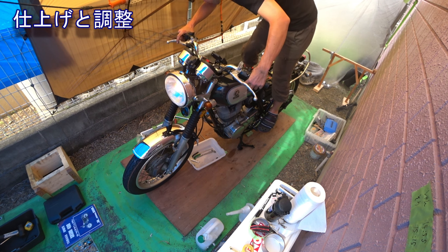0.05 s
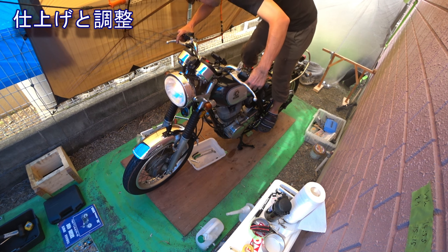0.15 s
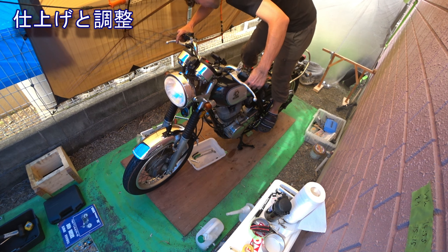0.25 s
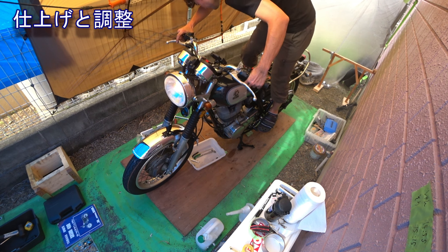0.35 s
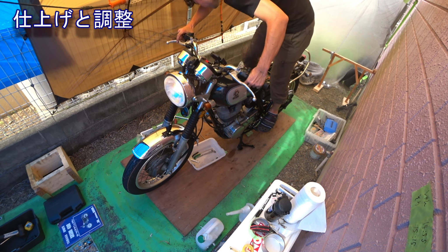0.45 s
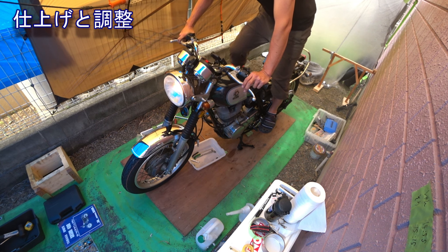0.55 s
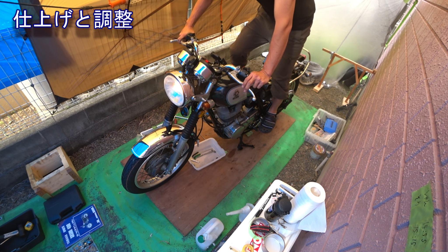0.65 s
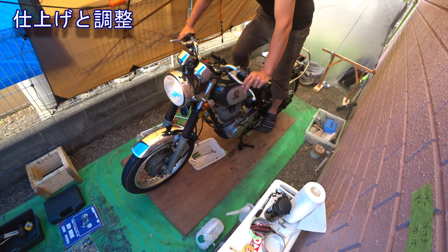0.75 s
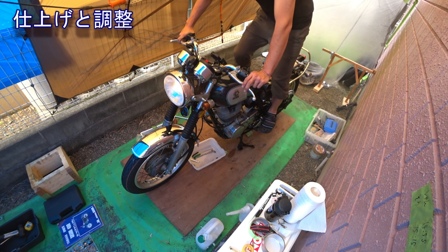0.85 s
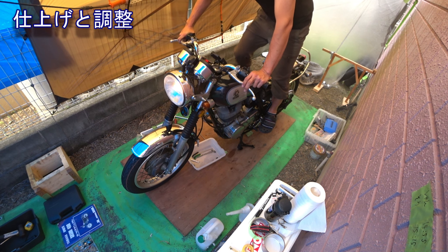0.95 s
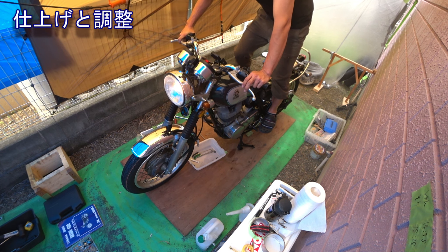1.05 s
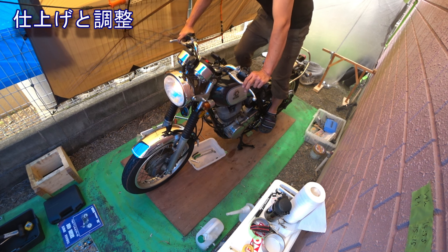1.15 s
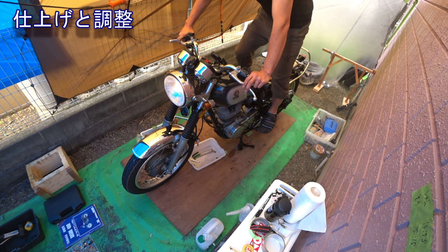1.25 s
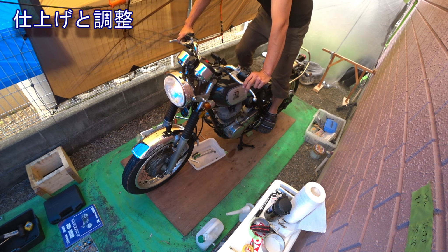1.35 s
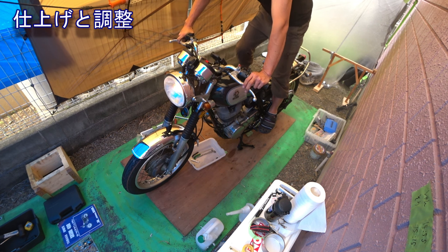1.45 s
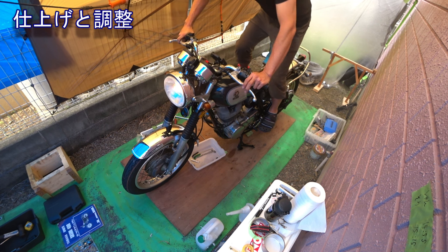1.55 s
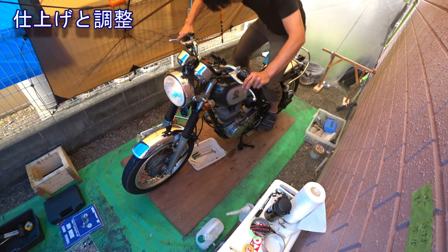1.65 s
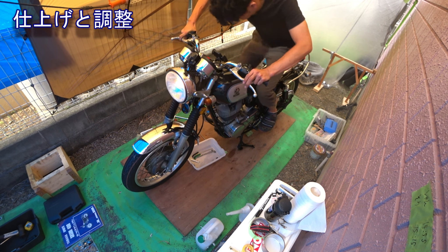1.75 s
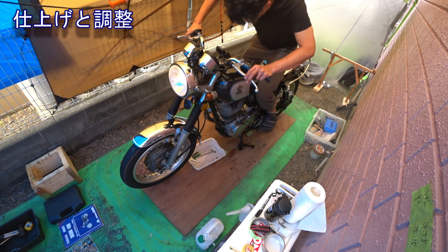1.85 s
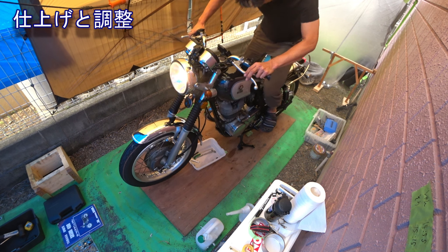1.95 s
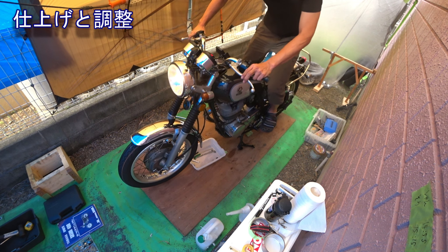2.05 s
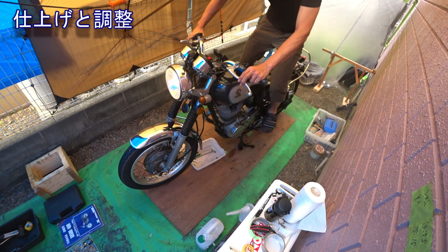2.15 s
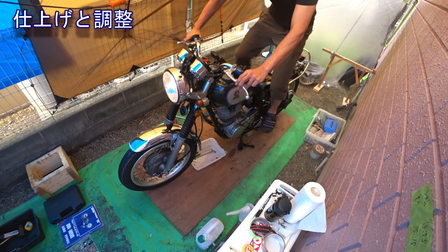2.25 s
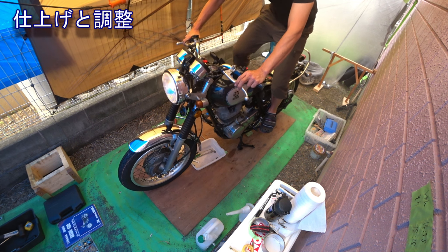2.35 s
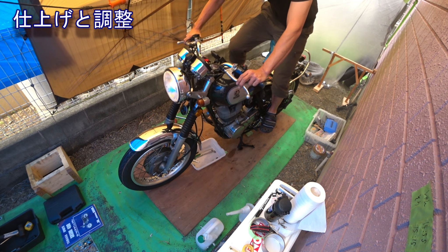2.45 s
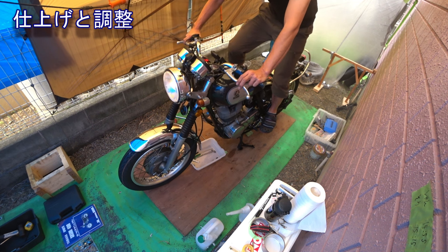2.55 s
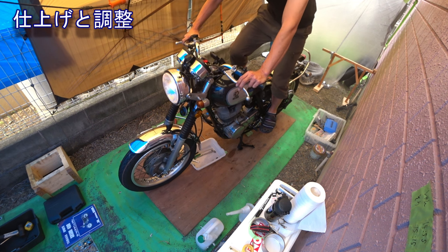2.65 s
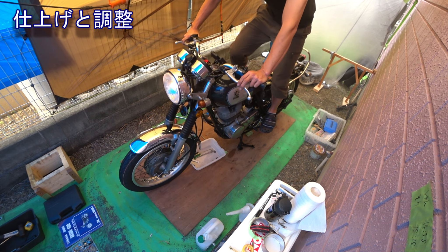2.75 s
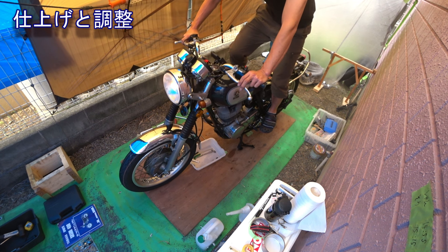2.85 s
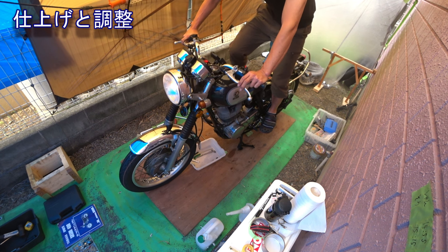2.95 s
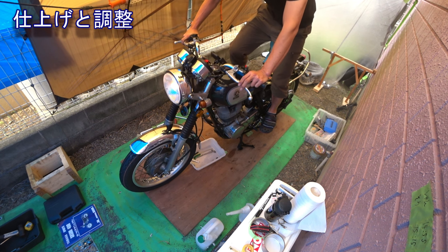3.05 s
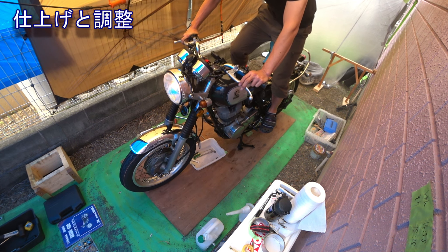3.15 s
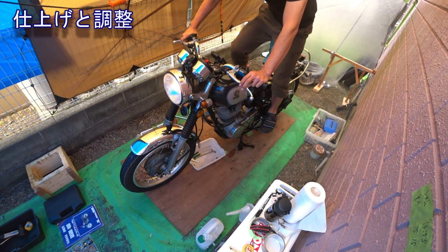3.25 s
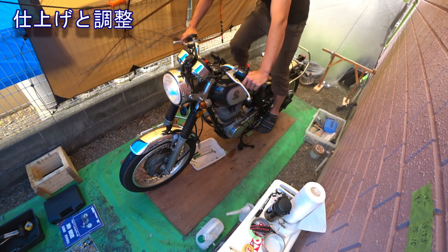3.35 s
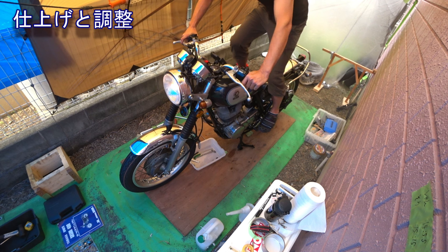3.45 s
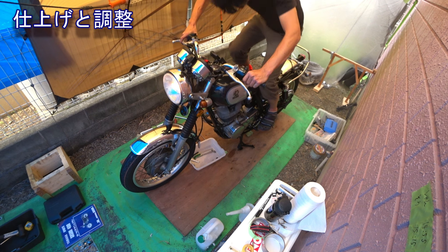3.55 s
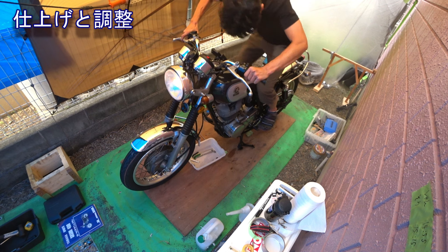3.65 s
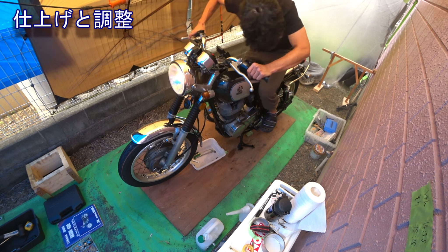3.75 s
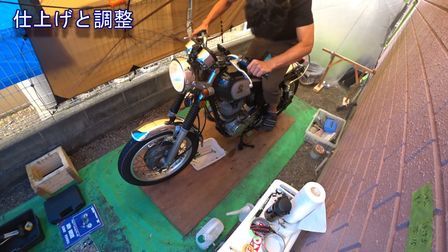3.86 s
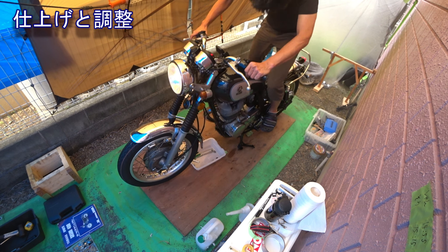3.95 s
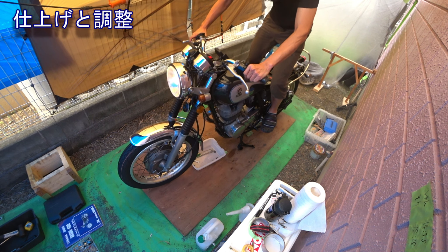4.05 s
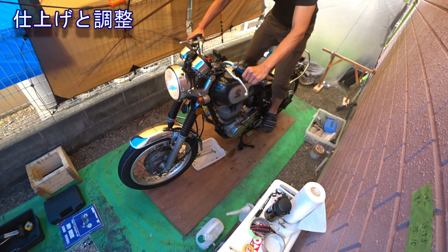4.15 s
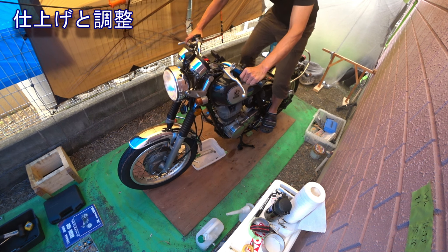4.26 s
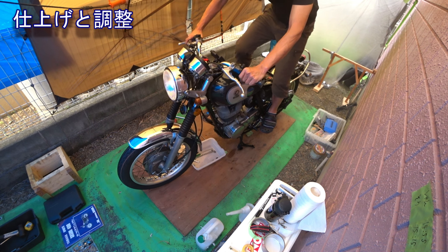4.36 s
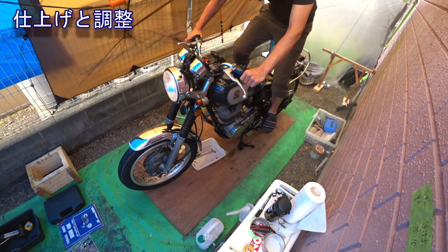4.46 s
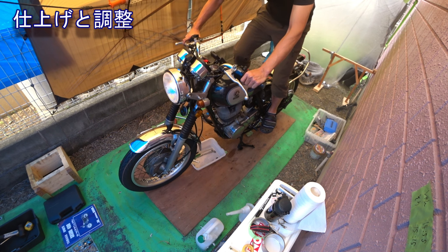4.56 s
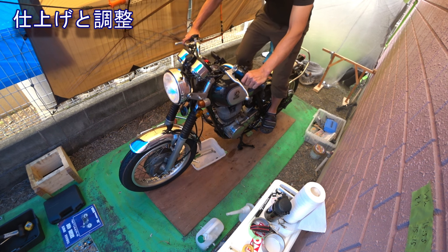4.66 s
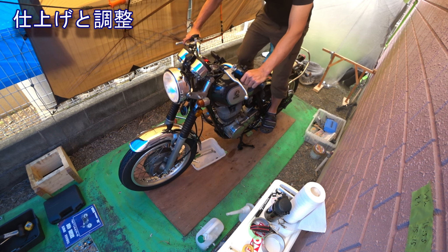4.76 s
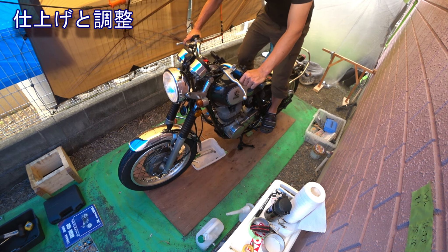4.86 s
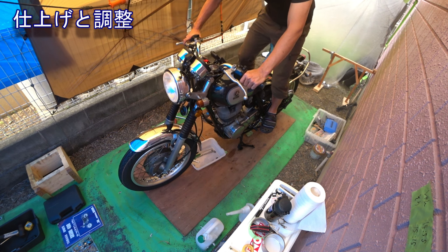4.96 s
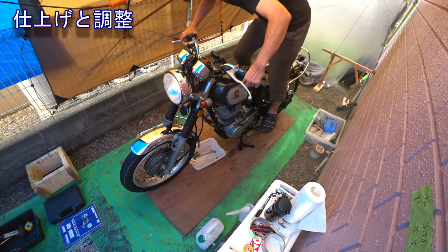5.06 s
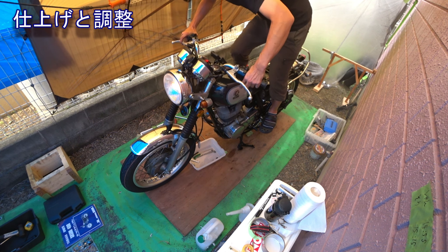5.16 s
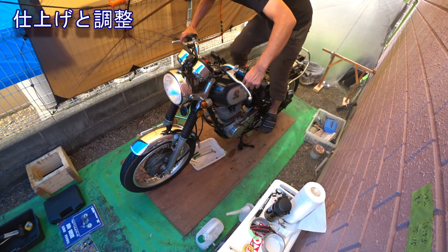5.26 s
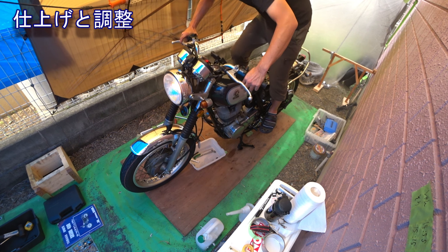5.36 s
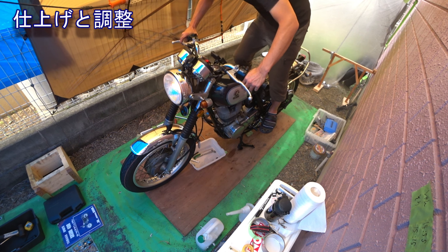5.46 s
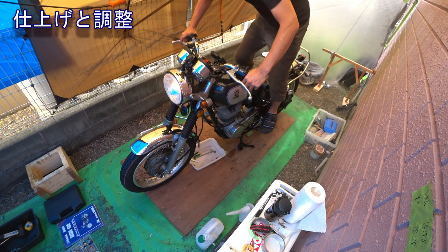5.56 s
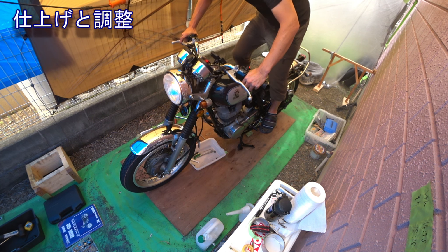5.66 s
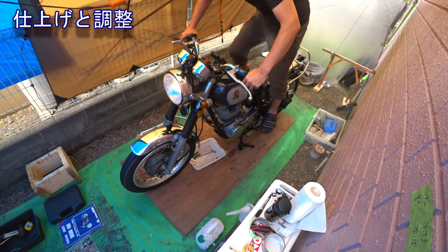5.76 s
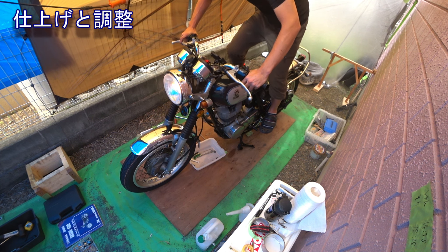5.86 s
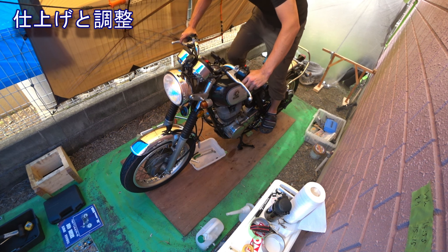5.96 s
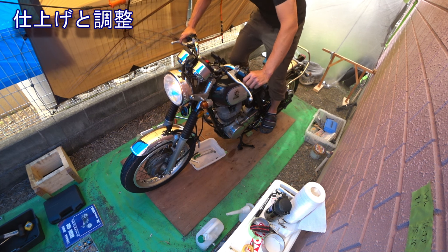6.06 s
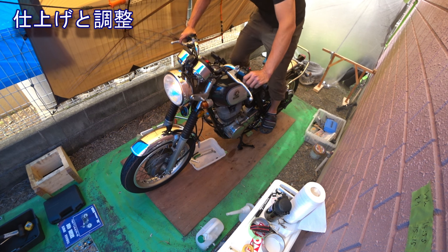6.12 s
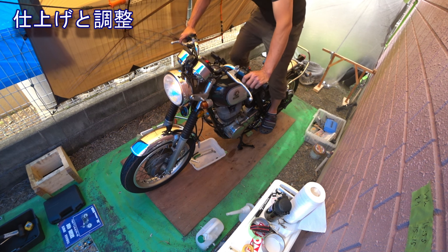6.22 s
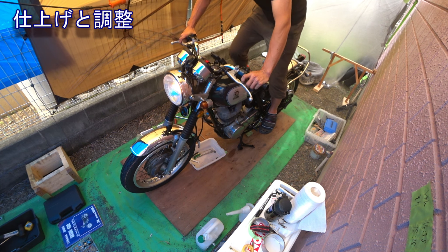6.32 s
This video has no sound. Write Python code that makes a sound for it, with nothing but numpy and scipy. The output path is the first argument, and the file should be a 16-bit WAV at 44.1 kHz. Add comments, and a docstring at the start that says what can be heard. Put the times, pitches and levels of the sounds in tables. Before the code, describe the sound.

Quiet, uneven outdoor air with tiny gritty ticks opens the scene, with small knocks in the first second, the clearest near 0.7 s, a momentary dropout at 0.55 s, and faint chirps around 1.0-1.5 s. At 1.65 s the kick lever clacks home; by 1.8 s teeth crunch, gears and valves clatter over a low rumble, and hollow exhaust puffs sag in pitch. From 1.96 to 2.23 s ringing ratchet clicks slow down, then the lever clunks at 2.3 s. Light taps, thin squeaks and scuffs fill 2.6-3.3 s; the level dips briefly at 3.36 s. A second kick begins at 3.6 s, similar, its clicks slowing until 4.13 s, with a clank at 4.2 s. No ignition follows. A knock at 4.65 s, a faint creak at 4.9 s, a sharp bright clack at 5.07 s, scattered metal taps to 6.2 s and a barely audible hum finish. Nearby small microphone, short close-wall reflections.

```python
"""A single-cylinder motorcycle is kicked over twice by foot in a narrow yard; it does not fire.
Small random impacts make the clatter of gears and valves over a rumble, and falling tones puff in the pipe.
Ringing snaps of the starter ratchet come slower as the crank coasts. Lever, stand and boot knock in
between: short noise bursts that ring the metal. Patchy noise is the air of the yard, with ticks of grit,
faint gliding squeaks, chirps and a hum. The level drops out briefly twice."""
import sys
import numpy as np
from scipy import signal
from scipy.fft import rfft, irfft
from scipy.io import wavfile
from scipy.ndimage import uniform_filter1d

SR = 44100
rng = np.random.default_rng(int(sys.argv[2]) if len(sys.argv) > 2 else 0)


def to_wav(sig):
    """Store sig (one row per channel, or 1-D mono) as 16-bit WAV at the path in sys.argv[1].

    Samples outside -1..1 are clipped; the rate is SR.
    """
    pcm = np.clip(np.atleast_2d(sig), -1, 1) * 32767
    pcm = np.round(pcm).astype(np.int16)
    wavfile.write(sys.argv[1], SR, pcm.T)  # frames by channels


N = 281799  # length in samples

# Swells of the yard air, before a small overall trim: time_s, middle_level_db, treble_level_db
YARD_SWELLS = [(0.0, -62.5, -65), (0.45, -59.5, -58), (0.8, -54.5, -58.5), (1.1, -61, -64.5),
               (1.6, -54.5, -53.5), (2.6, -48.5, -52.5), (2.85, -56.5, -58.5), (3.1, -57, -54.5),
               (3.25, -57.5, -56.5), (3.44, -43.5, -55), (3.58, -43, -42), (4.45, -46.5, -54),
               (5.0, -49.5, -51.5), (5.2, -55, -61), (5.5, -54.5, -61), (5.9, -58, -57.5),
               (6.06, -52, -59.5), (6.39, -55, -58)]
# Tone colour of the yard air: frequency_hz, level_db
YARD_COLOUR = [(18, -65), (30, -33), (135, -29), (157, -14), (245, -14), (392, -9.5), (466, -6.5),
               (514, -13), (567, -8.5), (1520, -4.5), (3530, -13), (3900, -11), (4870, -14.5), (6550, -15),
               (11000, -23.5), (14300, -58.5), (22000, -120)]
# How alike the yard air is on left and right: frequency_hz, likeness (0 to 1)
YARD_LIKENESS = [(60, 0.55), (220, 0.91), (840, 0.023), (3150, 0.03), (11800, 0.45)]
# Ringing modes of engine case, lever and frame: pitch_hz, width_hz, level_db
CASE_MODES = [(615, 10, 1.5), (620, 26, -18.5), (880, 25, 2), (1338, 32, -3.5), (1700, 49, -12),
              (1597, 40, -2.5), (2060, 61, -2), (2946, 41, -20), (2877, 32, -13.5), (3215, 34, 0.5),
              (3995, 93, -1), (4820, 170, 7), (5217, 61, 1), (5690, 56.13, -4), (5550, 100, -1.5),
              (6140, 130, -1), (6835, 63, 0.5), (6570, 77.7, -3.5), (7360, 125, 1), (7640, 90, -10),
              (7930, 90.5, -7)]
# Tone colour of the dense metallic tail of a blow: frequency_hz, gain_db
CRACK_COLOUR = [(35, -71), (60, -26.5), (217, -9.5), (359, 1.5), (1450, -11.5), (1610, 0.5), (1840, -9),
                (7270, -7), (11000, -24.5), (14300, -48.5), (22000, -120)]
# Sharp knocks of lever, stand and boot; the struck spot favours modes near one pitch:
# time_s, level_db, lows_trim_db, highs_trim_db, favoured_pitch_hz
TAPS = [(0.0528, -49.5, -5, -4, 3150), (0.192, -44.5, -16, 0.5, 1490), (0.4782, -44.5, 8, -8.5, 590),
        (0.636, -46, -19, -9, 861), (0.6862, -26.5, -18.5, -10, 1460), (0.809, -38.5, -7.5, -14, 1570),
        (0.8622, -38.5, 1, -28, 886), (1.2468, -54, -13, 3.5, 6570), (1.6556, -17.5, -15.5, -14.5, 1610),
        (1.7335, -15, -9, -5.5, 3950), (3.602, -22.5, -2, -9, 532.7), (2.3079, -22.5, -21.5, -9.5, 3520),
        (2.3518, -17, -6, -10.5, 1620), (2.6494, -27.5, -4.5, -15, 875), (2.849, -50, -20, 4, 4820),
        (3.2375, -48, -7, -3, 1060), (4.2016, -22, -40, -3, 2860), (4.2346, -15.5, -2.5, -12, 1630),
        (4.5096, -47, -15, 5.5, 5350), (4.6249, -33.5, -24, -6.5, 2060), (4.6497, -25.5, -9.5, -9.5, 880),
        (5.0736, -16, -16.5, 2.5, 1590), (5.2962, -48, -11, -18.5, 1546), (5.3237, -40, -9, -9.5, 2060),
        (5.395, -22.5, -20, -7.5, 2060), (5.4553, -36.5, -5, -7, 1630), (5.4769, -26.5, 0.5, -14.5, 1630),
        (5.6284, -48, -5, -22, 619), (5.675, -50.5, -0.5, -9, 891), (5.888, -48, -7, -5, 1567),
        (5.915, -43.5, -4, -10, 2060), (6.007, -22.5, -20.5, -9.5, 2060), (6.0718, -34, -9, -9, 2060),
        (6.0941, -28, -2, -11, 1620), (6.1919, -48.5, 5, -7, 506)]
# Dragging, scuffing contacts: time_s, level_db, lows_trim_db, highs_trim_db, favoured_pitch_hz
SCUFFS = [(1.4409, -44, -2, -30, 750), (2.6199, -37, -22, -7, 2200), (3.038, -44, -13, -9.5, 2860),
          (3.0701, -39.5, -16, -1.5, 1420), (3.0969, -31, -4.5, -10.5, 1360),
          (3.3234, -43.5, -33, -7.5, 5440), (5.0052, -32, -6.5, -6.5, 1320)]
# Left-right balance of the motorcycle: frequency_hz, left_over_right_db
SIDE_TILT = [(60, -1), (170, 1.5), (500, 2.5), (1430, 2), (4100, -1), (11800, 0.5)]
# How much the reflections differ between the sides: frequency_hz, gain_db
SIDE_SHARE = [(60, -18), (140, -16), (350, -21), (840, -13.5), (2030, -9), (4890, -12), (11800, -7.5)]
# Thin squeaks: start_s, length_s, start_pitch_hz, end_pitch_hz, level_db
SQUEAKS = [(.57, 0.12, 859, 869, -60), (2.555, 0.08, 4160, 4280, -60), (2.57, 0.066, 3030, 3120, -58),
           (2.72, .072, 4150, 4430, -63.5), (2.75, 0.0615, 3210, 3313, -62), (2.76, 0.045, 1635, 1700, -59),
           (2.9, .04, 1750, 1970, -62), (2.97, .033, 1450, 1413, -58), (3.37, .062, 6840, 6800, -62)]
# Fuzzy chirps and a creak: start_s, length_s, start_pitch_hz, end_pitch_hz, level_db
CHIRPS = [(1.0, .07, 4000, 3950, -63), (1.2, .1, 4140, 3800, -63), (1.31, .1, 3700, 4200, -64),
          (1.37, .13, 4300, 4300, -64), (1.25, .12, 1600, 1500, -66), (4.92, .085, 1400, 1310, -47)]
# A low hum: start_s, length_s, start_pitch_hz, end_pitch_hz, level_db
HUM = [(5.85, .25, 243, 241, -67), (6.08, .34, 241, 239, -61)]
# Stages 0 to 6 of each kick: lever_engages_s, teeth_bite_s, exhaust_opens_s, pawl_lets_go_s,
# last_tooth_s, lever_stops_s, still_s
KICKS = [(1.655, 1.772, 1.888, 1.962, 2.238, 2.313, 2.606),
         (3.605, 3.711, 3.794, 3.905, 4.132, 4.218, 4.47)]
# What every kick does: stage (number), clatter_level_db, rumble_level_db
STROKE_LEVELS = [(0, -54.5, -30), (.45, -46.5, -40.5), (.9, -29, -32.5), (1.1, -27, -33), (2, -24, -24.5),
                 (2.8, -28, -33), (3.15, -22, -38), (3.701, -28, -40.5), (4.1, -44, -40.5), (5, -51, -44),
                 (5.4, -45.5, -42.5), (6, -69, -65.5)]
# Tone colour of gears and valves: frequency_hz, gain_db
CLATTER_COLOUR = [(470, -41.5), (800, -4.5), (1400, -12.5), (1630, -3.5), (2030, -8), (2920, -2),
                  (5330, -11.5), (6200, -9), (7200, -6), (8000, -8.5), (9000, -16.5), (11000, -15),
                  (14300, -55.5), (22000, -120)]
# Tone colour of the rumbling case: frequency_hz, gain_db
RUMBLE_COLOUR = [(15, -68), (25, -50.5), (151, -30.5), (244, -9), (394, -4), (595, -3), (782, -10),
                 (882, -3.5), (1500, -8), (1950, -23.5), (3300, -120)]
# Air pushed out of the pipe: start_s, level_db, start_pitch_hz
PUFFS = [(1.731, -21.5, 400), (1.794, -27, 680), (1.829, -27, 669), (1.884, -18, 608), (1.953, -30, 390),
         (3.69, -17.5, 366), (3.753, -32.5, 656), (3.793, -21, 413), (3.829, -27.5, 604),
         (3.863, -31.5, 408)]
# Starter teeth biting on the down stroke: time_s, level_db
BITES = [(1.7835, -8.5), (1.7995, -15), (1.8128, -12), (1.8325, -21), (1.8871, -22), (3.696, -20),
         (3.7123, -12), (3.7292, -11.5), (3.7537, -12.5), (3.7737, -23.5), (3.7942, -17.5), (3.8287, -21)]
# The pawl dropping over each tooth, ever slower: time_s, level_db
PAWL_DROPS = [(1.9624, -25), (1.978, -14.5), (1.9943, -19), (2.0104, -14.5), (2.0368, -14), (2.0554, -17.5),
              (2.0794, -17), (2.1048, -14), (2.1334, -14), (2.1627, -17), (2.1911, -13.5), (2.2296, -15.5),
              (3.905, -15.5), (3.9168, -16), (3.9325, -12), (3.9536, -14.5), (3.9753, -13.5), (4.0015, -15),
              (4.0273, -15), (4.0587, -14), (4.093, -15), (4.132, -15.5)]
# Close pair of bending modes of the lever: lower_pitch_hz, upper_pitch_hz
LEVER_MODES = (1602.6, 1630)
# Brief drops in level: centre_s, half_width_s, level_change_db
DIPS = [(0.554, 0.0088, -52.5), (3.364, 0.0065, -18)]


def gain_of(db):
    """Turns decibels into a gain."""
    return 10 ** (np.asarray(db) / 20)


def evened(x):
    """Scales a sound to an rms level of 1."""
    return x / np.sqrt(np.mean(x ** 2) + 1e-20)


def read(points, hz):
    """Reads values from a frequency table, spacing frequencies by ratio."""
    f, value = np.transpose(points)
    return np.interp(np.log(hz + 1), np.log(f + 1), value)


def colour(x, points):
    """Makes each frequency louder or softer as a table says."""
    size = x.shape[-1]
    gain = gain_of(read(points, np.fft.rfftfreq(size, 1 / SR)))
    return irfft(rfft(x) * gain, size)


def add(mix, start_s, sound):
    """Mixes a sound in at a time."""
    part = mix[..., round(start_s * SR):][..., :sound.shape[-1]]
    part += sound[..., :part.shape[-1]]


def yard():
    """Patchy background noise whose middle and treble swell on their own; the lows follow the middle."""
    frames, hz = N // 512 + 5, np.fft.rfftfreq(2048, 1 / SR)
    a, b, c, d, patches = rng.standard_normal((frames, 1025, 5)).T
    patches = uniform_filter1d(patches, size=24, axis=0)
    patches = evened(uniform_filter1d(patches, size=5, axis=1))
    time_s, middle_db, treble_db = np.transpose(YARD_SWELLS)
    low_db = -60 + 0.47 * (middle_db + 58)
    t = np.arange(frames) * 512 / SR
    power = 0
    bands = ((low_db, 1, 606), (middle_db, 520, 1500), (treble_db, 2200, 42000))
    for band_db, low_hz, high_hz in bands:
        share = 1 / (1 + (low_hz / (hz + 1)) ** 6) / (1 + (hz / high_hz) ** 6)
        share = share * gain_of(read(YARD_COLOUR, hz)) ** 2
        swell = gain_of(np.interp(t, time_s, band_db)) ** 2
        power = power + np.outer(share / share.sum(), swell)
    same = np.clip(read(YARD_LIKENESS, hz), -1, 1)[:, None]
    left = a + 1j * b
    right = same * left + np.sqrt(1 - same ** 2) * (c + 1j * d)
    spectrum = np.array([left, right]) * np.sqrt(power) * gain_of(0.77 * patches)
    return gain_of(-1.5) * signal.istft(spectrum, nperseg=2048, noverlap=1536)[1][:, :N]


def ring(force, detune, spread_db, favoured_hz=7300, favour_db=2):
    """The case modes answer a force; every contact point wakes them in other shares."""
    out = np.zeros(len(force))
    for hz, width_hz, db in CASE_MODES:
        a, b = rng.standard_normal(2)
        radius = np.exp(-np.pi * width_hz / SR)  # a wider mode dies sooner
        angle = 2 * np.pi * hz * (1 + detune * a) / SR
        near_db = favour_db * np.exp(-(np.log(hz / favoured_hz) / .11) ** 2)
        mode = signal.lfilter([1], [1, -2 * radius * np.cos(angle), radius ** 2], force)
        out += gain_of(db + near_db + spread_db * b) * evened(mode)
    return evened(out)


def rustle():
    """Tiny scattered ticks of grit and loose parts ring the case, most barely over the air."""
    hit = rng.random(N) < 66 / SR  # about 66 ticks per second
    strength = gain_of(4 * np.minimum(rng.exponential(1, N), 3))
    fade = np.exp(-np.arange(900) / 200)
    grain = rng.standard_normal(900) * fade
    force = signal.oaconvolve(hit * strength, grain)[:N]
    return gain_of(-72) * ring(force, .02, 4)


def blow(lows_db, highs_db, decay_s, rise_s, ring_db, chatter_s, favoured_hz, favour_db):
    """A burst of chattering contact rings the case; a dense metallic tail dies after it."""
    t = np.arange(16384) / SR
    noise = rng.standard_normal((3, len(t)))
    contact = noise[0] * (t / chatter_s) * np.exp(-t / chatter_s)
    swell = (1 - np.exp(-t / rise_s)) ** 2
    fade = gain_of(-60 * t / decay_s) + gain_of(-10 - 24 * t / decay_s)  # fast, then slow
    tail = colour(noise[1], CRACK_COLOUR) * swell * fade
    # the frame answers later and lasts longer
    body = colour(noise[2], [(200, -8.5), (450, 4.5), (1100, 5.5), (1900, -25.5)])
    body = body * (1 - np.exp(-t / 0.01)) ** 2
    body = evened(body * gain_of(-45 * t / decay_s))
    modes = ring(contact, .008, 3.5, favoured_hz, favour_db)
    sound = gain_of(-9) * body + evened(tail) + gain_of(ring_db) * modes
    sound = colour(sound, [(150, lows_db - 14.0), (600, lows_db + 0.5), (1300, 0.041),
                           (3000, 0.041), (5000, highs_db - 1.5)])
    # the middle band sets the loudness
    middle = colour(sound, [(800, -40), (1000, 0), (3500, 0), (4000, -40)])
    return sound / (3 * np.sqrt(uniform_filter1d(middle ** 2, size=400).max()))


def knocks():
    """Single blows, each with its own colour; scuffs start softly and last longer."""
    out = np.zeros(N)
    for rows, decay_s, rise_s in ((TAPS, 0.12, 0.0021), (SCUFFS, 0.2, 0.0069)):
        for s, db, lows_db, highs_db, hz in rows:
            knock = blow(lows_db, highs_db, decay_s, rise_s, -1.5, 1.2 * rise_s, hz, 10)
            add(out, s - .0015, gain_of(db) * knock)
    return out


def walls(x):
    """Close walls return sparse reflections, other ones to each side."""
    echoes = np.zeros((2, 16000))
    at = np.arange(120, 15960, 20) + rng.integers(0, 20, (2, 792))
    np.put_along_axis(echoes, at, rng.choice([-1., 1.], at.shape), 1)
    echoes *= gain_of(-60 * np.arange(16000) / SR / 0.095)  # 60 dB down in 0.095 s
    return signal.fftconvolve(x, echoes / np.linalg.norm(echoes[0]), axes=1)[:, :N]


def squeaks():
    """Thin tones that glide and waver: squeaks, fuzzy chirps, a creak and a low hum."""
    out = np.zeros(N)
    for rows, waver in ((SQUEAKS, .01), (CHIRPS, .045), (HUM, .012)):  # waver as a share of pitch
        for start_s, length_s, from_hz, to_hz, db in rows:
            size = round(length_s * SR)
            wobble = evened(uniform_filter1d(rng.standard_normal(size), size=150))
            hz = np.linspace(from_hz, to_hz, size) * (1 + waver * wobble)
            tone = np.sin(2 * np.pi * np.cumsum(hz) / SR)
            add(out, start_s, gain_of(db) * tone * signal.windows.tukey(size, .5))
    return out


def strokes():
    """Dense small impacts of gears, chain and valves, with the rumble of the case below."""
    out = np.zeros(N)
    stages, clatter_db, rumble_db = np.transpose(STROKE_LEVELS)
    for times in KICKS:
        t = np.arange(times[0], times[-1], 1 / SR)
        size = len(t)
        stage = np.interp(t, times, np.arange(len(times)))
        ticks = gain_of(3 * np.minimum(rng.exponential(1, size), 3))
        ticks = ticks * (rng.random(size) < 1000 / SR)  # about 1000 per second
        ticks = signal.oaconvolve(ticks, np.exp(-np.arange(600) / 80))[:size]
        ticks = ticks * rng.standard_normal(size)
        clatter = evened(colour(ticks, CLATTER_COLOUR))
        clatter = evened(clatter + gain_of(-12) * ring(ticks, detune=0.01, spread_db=2.3))
        lumps = gain_of(1.1 * evened(uniform_filter1d(rng.standard_normal(size), size=500)))
        rumble = evened(colour(rng.standard_normal(size), RUMBLE_COLOUR) * lumps)
        both = gain_of(np.interp(stage, stages, clatter_db)) * clatter
        both = both + gain_of(np.interp(stage, stages, rumble_db)) * rumble
        add(out, times[0], both * signal.windows.tukey(size, .02))
    return out


def puffs():
    """Short hollow thumps of the pipe: the note sags and a lower push goes with it."""
    out, t = np.zeros(N), np.arange(6000) / SR
    rise_s = 0.0057
    swell = (t / rise_s * np.exp(1 - t / rise_s)) ** 2
    push = gain_of(-11.5) * np.sin(2 * np.pi * 160 * t)
    for s, db, hz in PUFFS:
        note = np.sin(2 * np.pi * hz * t * (1 - 2.8 * t) + 2 * np.pi * rng.random())
        add(out, s, gain_of(db) * (note + push) * swell)
    return out


def ratchet():
    """Each tooth snaps; the lever's two modes start opposed, so their ring swells and fades in one beat."""
    out, t = np.zeros(N), np.arange(4000) / SR
    # rows, trim of the highs in dB, lever ring beside the snap in dB
    for rows, highs_db, lever_db in ((BITES, 1.1, -22), (PAWL_DROPS, 3, -6)):
        for s, db in rows:
            a, b, c = rng.standard_normal(3)  # no two teeth sound alike
            snap = blow(-20, highs_db + 2 * a, .13, .0019, -3, .004, favoured_hz=7350, favour_db=10)
            add(out, s - .0015, gain_of(db) * snap)
            detune, phase = 1 + 0.0071 * b, rng.random()
            low, high = (np.sin(2 * np.pi * (hz * detune * t + phase)) for hz in LEVER_MODES)
            fade = gain_of(db + lever_db + 2 * c - 60 * t / 0.075)
            add(out, s, fade * (low - high))
    return out


def scene():
    """The motorcycle with its reflections, over the yard air and the squeaks."""
    bike = knocks() + ratchet() + puffs() + strokes() + rustle()
    left, right = walls(bike[None])
    mid = bike + gain_of(-15.5) * (left + right)
    side = gain_of(-1.5) * colour(left - right, SIDE_SHARE)  # reflections make the two sides unlike
    heard = []
    for sign in (1, -1):  # left, then right
        tilt = [(hz, sign * db / 2) for hz, db in SIDE_TILT]
        heard.append(colour(mid + sign * side, tilt))
    return heard + yard() + squeaks()


def low_pass(x):
    """Removes everything above the highest recorded frequency."""
    return signal.sosfilt(signal.butter(12, 12380, fs=SR, output="sos"), x)


def record(dry):
    """A small microphone thins the bass, peaks are rounded, the level dips briefly and the top is cut."""
    t = np.arange(N) / SR
    dip_db = sum(db * np.exp(-((t - s) / half_width_s) ** 4) for s, half_width_s, db in DIPS)
    bass_cut = signal.butter(1, 60, "high", fs=SR, output="sos")
    thinned = signal.sosfilt(bass_cut, dry)
    rounded = 0.74 * np.tanh(thinned / 0.77)  # the input stage rounds the highest peaks
    treble_cut = signal.firwin(401, 11170, window=("kaiser", 5), fs=SR)
    finished = signal.oaconvolve(rounded * gain_of(dip_db), treble_cut[None], "same")
    return low_pass(finished)


dry = scene()
out = record(dry)
to_wav(out)
```